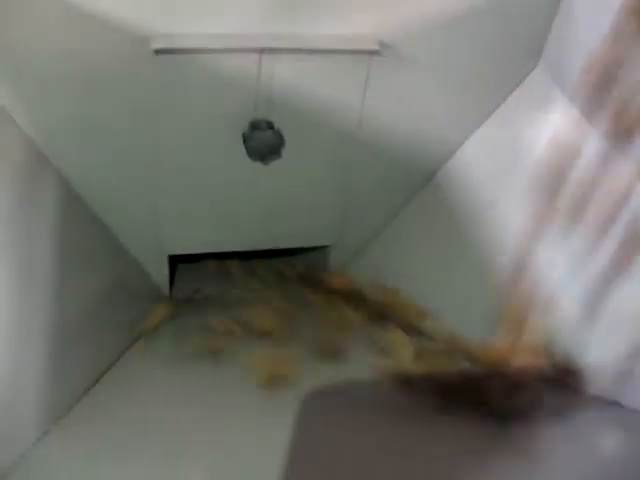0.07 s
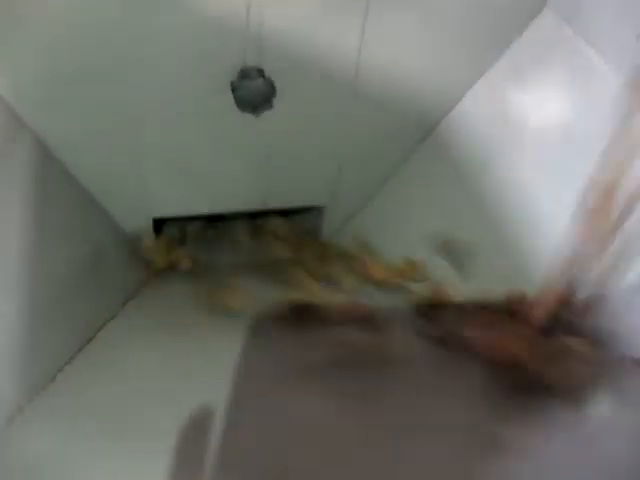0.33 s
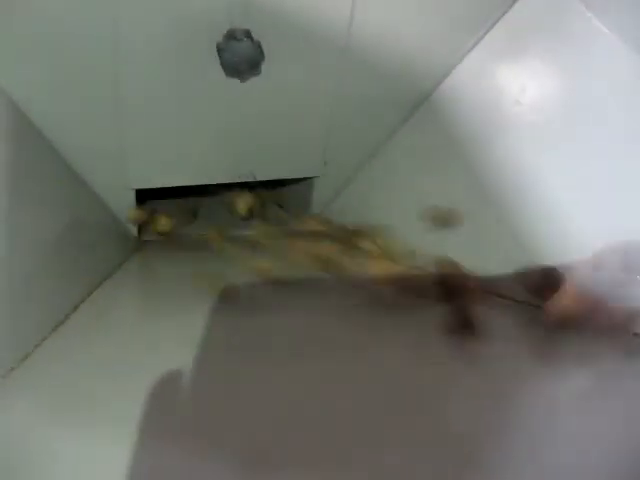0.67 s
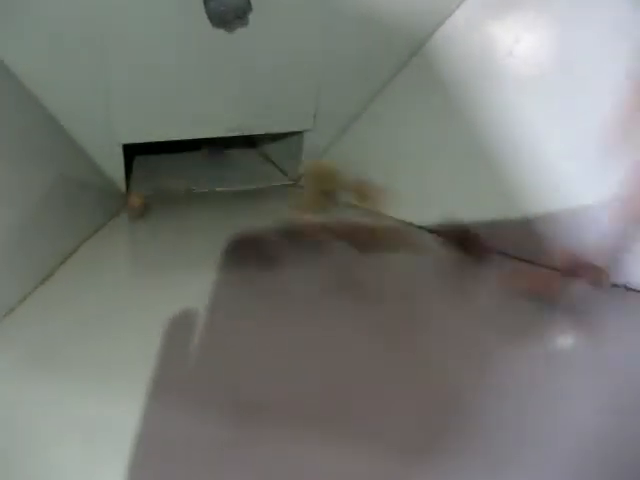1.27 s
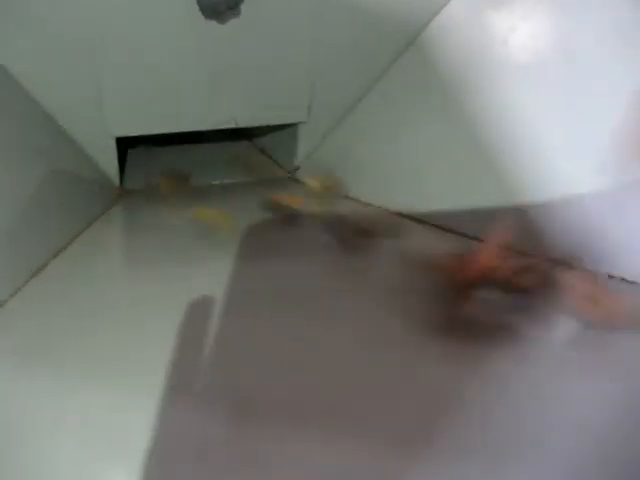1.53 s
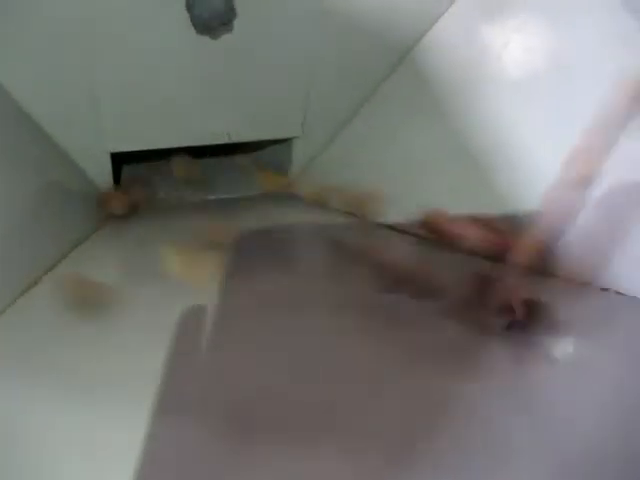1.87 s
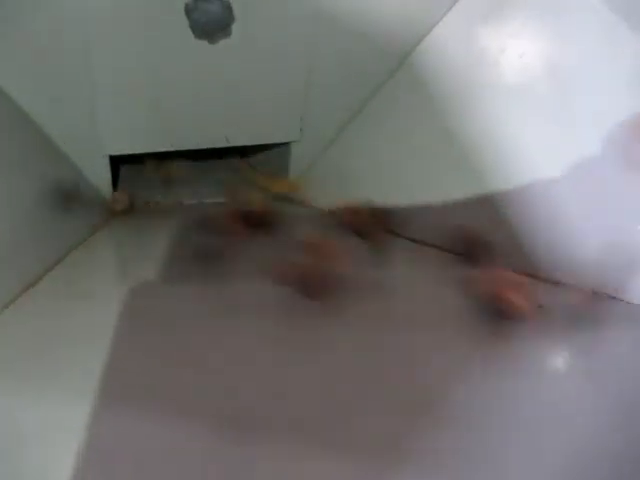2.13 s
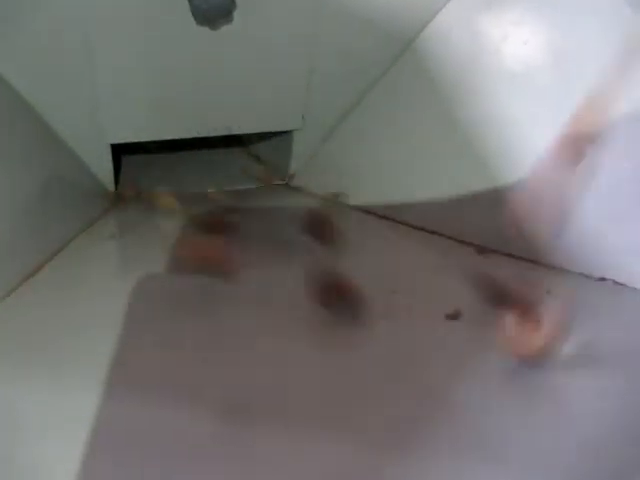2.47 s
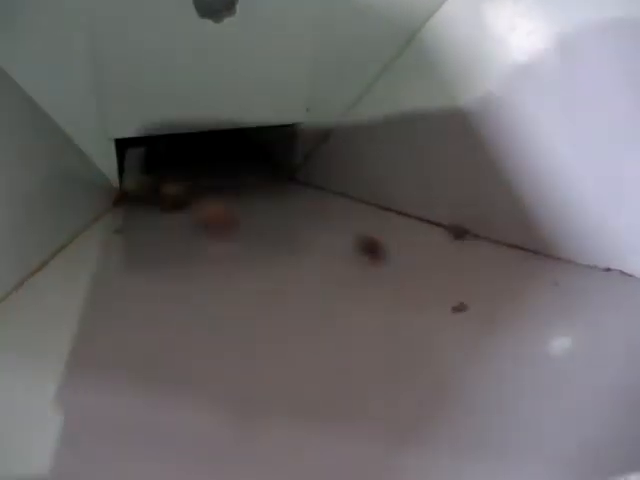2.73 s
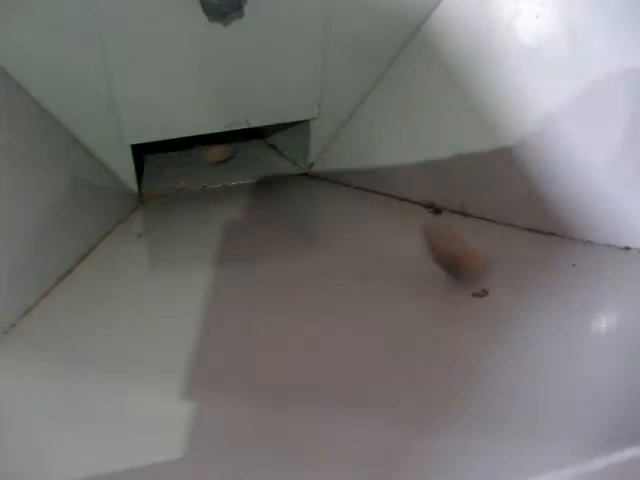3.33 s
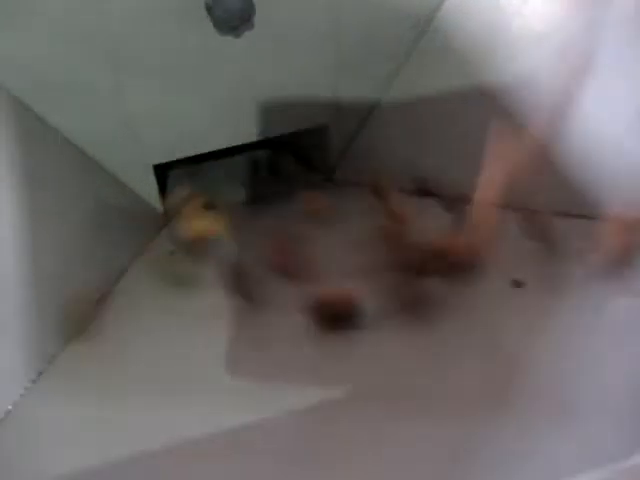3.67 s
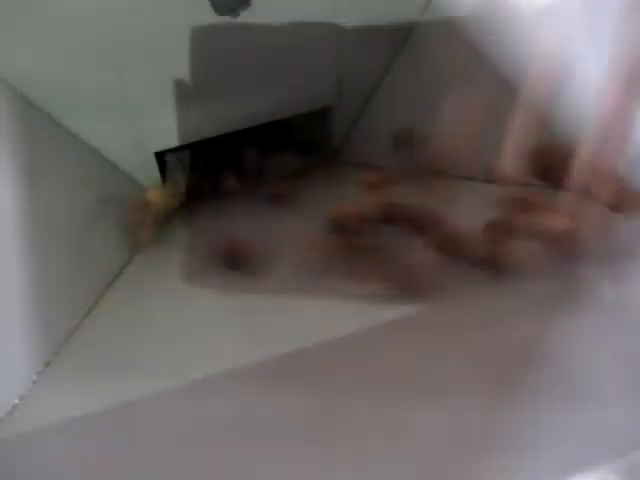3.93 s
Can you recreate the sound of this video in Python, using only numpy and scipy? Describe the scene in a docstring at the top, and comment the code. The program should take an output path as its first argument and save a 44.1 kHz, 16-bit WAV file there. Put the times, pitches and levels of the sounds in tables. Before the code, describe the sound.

Nuts rattle and clack down a steel hopper over a grading machine's loud drone.

```python
"""A steel hopper rattles with nuts over the drone of a grading machine, close to a small microphone.
The drive shakes the housing, nuts tumble inside, and dull blows make the panels boom.
Swept down by hand, single nuts clack on the ringing steel, thin out, then pour in a dense rattle.
The din overloads the microphone, which rounds off the peaks and passes little treble.
Near the end comes one tiny tick, brighter than all the rest."""
import sys
import numpy as np
from scipy import signal
from scipy.fft import rfft, irfft
from scipy.io import wavfile

SR = 44100
rng = np.random.default_rng(int(sys.argv[2]) if len(sys.argv) > 2 else 0)


def wrap_up_sound(samples):
    """Save the sound to the file named by the first command line argument, as 16-bit audio."""
    columns = np.atleast_2d(samples).T
    # keep every value between -1 and 1, then stretch to whole-number steps
    tamed = np.clip(columns, -1, 1)
    steps = np.round(tamed * 32767).astype(np.int16)
    wavfile.write(sys.argv[1], SR, steps)


N = 176400
T = np.arange(N) / SR

# resonances of the machine's housing (frequency [Hz], nominal width [Hz], level [dB])
HOUSING_MODES = [(266.4, 9.4, -45), (300.4, 22, -42.5), (399, 8.9, -44), (512, 14, -37.5),
                 (535.6, 8.7, -41.5), (563.4, 9.6, -38.5), (597, 9.1, -41), (624.4, 14, -40),
                 (687.2, 9, -40.5), (715.6, 4.7, -34.5), (765, 26, -38), (844.4, 18, -37.5),
                 (902, 17, -37.5), (947.4, 28, -39.5), (1004, 20, -38.5), (1327, 19, -43)]


def amp(db):
    """Decibels to gain."""
    return 10 ** (np.asarray(db) / 20)


def unit(x):
    """Scales to rms 1."""
    return x / np.sqrt(np.mean(x ** 2) + 1e-20)


def fader(points):
    """Gain that follows a table of (time [s], level [dB])."""
    return amp(np.interp(T, *np.transpose(points)))


def add(mix, s, sound):
    """Mixes a sound in at s seconds."""
    part = mix[max(round(s * SR), 0):][:len(sound)]
    part += sound[:len(part)]


def colour(x, points):
    """Causal filter that follows a table of (frequency [Hz], gain [dB])."""
    hz, db = np.transpose(points)
    f = abs(np.fft.fftfreq(2048, 1 / SR))
    log_gain = np.log(amp(np.interp(np.log(f + 1), np.log(hz), db)))
    minimum_phase = np.exp(np.conj(signal.hilbert(log_gain)))
    taps = np.fft.ifft(minimum_phase).real
    return signal.fftconvolve(x, taps[:len(taps) // 2])[:len(x)]


def lowpass(x, hz):
    """Steep band limit."""
    return signal.oaconvolve(x, signal.firwin(511, hz, window=("kaiser", 9), fs=SR), "same")


def resonate(x, hz, width_hz):
    """One resonance: the narrower it is, the longer it rings."""
    pole = np.exp((2j * hz - width_hz) * np.pi / SR)
    return signal.lfilter([1], [1, -pole], x).imag


def waver(rate_hz):
    """Slow random wobble of rms 1, strongest near the given rate."""
    ratio = np.fft.rfftfreq(N, 1 / SR) / rate_hz
    return unit(irfft(rfft(rng.standard_normal(N)) * ratio / (1 + ratio ** 4), N))


def machine(roar_db=-28.5, waver_db=0.8, hum_top_hz=437):
    """The drive shakes the housing: a wavering, hollow roar whose low hum swells and sinks."""
    # spectrum of the roar (frequency [Hz], relative level [dB])
    roar_spectrum = [(30, -41.5), (100, -20.5), (220, -9.5), (290, -10.5), (360, -11), (500, -3), (720, -4),
                     (950, -2), (1150, -5.5), (1500, -15), (2500, -13), (7000, -36)]
    # swell of the low hum (time [s], level [dB])
    hum_levels = [(0, -4.5), (.3, -0.5), (.45, 0), (.55, 2), (.77, 1.5), (.85, -1.5), (1.2, 0), (1.55, 4.5),
                  (1.6, -2.5), (1.98, -2), (2.06, 5.5), (2.4, 0), (2.8, 0), (3.3, -1.5), (3.78, 1), (4, -9)]
    roar = amp(roar_db) * unit(colour(rng.standard_normal(N), roar_spectrum))
    ring = np.zeros(N)
    for hz, width, db in HOUSING_MODES:
        shaking = resonate(rng.standard_normal(N), hz, 2 * width)
        ring += amp(db) * unit(resonate(shaking, hz, 2 * width))
    drone = (roar + ring) * amp(waver_db * waver(rate_hz=13.2))
    hum = signal.sosfiltfilt(signal.butter(4, hum_top_hz, fs=SR, output="sos"), drone)
    return drone - hum + fader(hum_levels) * hum


def clack(t60_s, crack_s=0.0021, crack_share=0.24):
    """One blow: a short crack, then dense reflections between the steel walls; energy 1."""
    t = T[:SR // 4]
    envelope = amp(-60 * t / t60_s) + crack_share * np.exp(-t / crack_s)
    burst = rng.standard_normal(len(t)) * envelope
    return burst / np.linalg.norm(burst)


def hail(per_s, spread_db, t60_s, spots=6):
    """Random blows of uneven size on several spots of the metal, each with its own clack."""
    out = np.zeros(N)
    for _ in range(spots):
        size = amp(spread_db * np.minimum(rng.exponential(1, N), 4))
        hits = rng.random(N) < per_s / spots / SR
        blows = size * hits / np.sqrt(per_s)  # the rate sets density, not loudness
        out += signal.oaconvolve(blows, clack(t60_s))[:N]
    return unit(out)


def tumbling(level_db=-24):
    """Nuts tumble behind the housing in a steady, duller rattle."""
    # spectrum of the rattle inside (frequency [Hz], relative level [dB])
    tumble_spectrum = [(300, -20), (1000, -14), (1450, -7), (1950, -0.5), (2600, 1), (3400, -2.5),
                       (4300, -8), (5500, -17.5), (7000, -15.5)]
    rattle = hail(per_s=2500, spread_db=5, t60_s=0.18)
    return amp(level_db) * unit(colour(rattle, tumble_spectrum))


def flow():
    """Strength of the stream down the hopper: uneven handfuls, a lull, then a full pour."""
    # stream of nuts (time [s], level [dB])
    pour_levels = [(0, -14), (.16, -22.5), (.21, -22.5), (.3, -19), (.37, -30), (.52, -19.5), (.65, -15),
                   (.77, -19), (.97, -15.5), (1.1, -20), (1.15, -24), (1.27, -21.5), (1.5, -25.5),
                   (1.7, -39.5), (2.22, -33), (2.41, -26), (2.48, -14.5), (3.1, -14.5), (3.7, -14.5),
                   (4, -15.5)]
    return fader(pour_levels)


def stream(trickle_per_s=250, pour_per_s=900):
    """Nuts strike more often as the flow grows; a trickle goes on between handfuls."""
    strength = flow()
    return hail(trickle_per_s + pour_per_s * strength / strength.max(), spread_db=4, t60_s=0.12)


def pouring(rumble_db=-35, waver_db=3):
    """The more nuts flow, the denser and louder the clatter, with an uneven deep rumble under it."""
    # deep rumble of the hopper (frequency [Hz], relative level [dB])
    rumble_spectrum = [(20, 0), (70, 1), (130, -2), (300, -26), (2000, -61.5)]
    # shells streaming over steel (frequency [Hz], relative level [dB])
    clatter_spectrum = [(60, -26), (220, -10), (550, 0), (950, 1.5), (1400, -7), (2000, 0), (2700, -1.5),
                        (3300, 0.5), (4200, 2), (5000, 1.5), (7000, -7.5)]
    rumble = unit(colour(rng.standard_normal(N), rumble_spectrum))
    rumble *= amp(rumble_db + waver_db * waver(rate_hz=11))
    clatter = unit(colour(stream(), clatter_spectrum))
    return flow() * (clatter + rumble)


def steel(blows, tumble_db=-25.5, knock_db=-5, ring_db=-2):
    """Stream, tumbling and single blows all ring the hopper's sheet steel at the same pitches."""
    # modes of the sheet (frequency [Hz], relative level [dB], time to fall 60 dB [s])
    steel_modes = [(1736, -20, 0.15), (1905, -22.5, 0.17), (1973, -16, 0.49), (2032, -21, 0.26),
                   (2100, -18.5, 0.15), (2170, -18.5, 0.23), (2280, -23, 0.23), (2355, -20, 0.098),
                   (2488, -20, .2), (2578, -22, .2), (2613, -19, 0.22), (2820, -25, .18), (3012, -15, 0.21),
                   (3226, -23.5, 0.16), (3330, -21, 0.11), (3532, -23, .22), (3520, -25.5, 0.16),
                   (3860, -26, .15), (3920, -21, .16), (3910, -21.5, 0.2), (4250, -23.5, .15),
                   (4370, -24.5, 0.16), (4690, -23.5, .12)]
    shaking = flow() * stream() + amp(tumble_db) * rng.standard_normal(N) + amp(knock_db) * blows
    ring = np.zeros(N)
    for hz, db, t60_s in steel_modes:
        width_hz = np.log(1000) / np.pi / t60_s
        ring += amp(db) * unit(resonate(shaking, hz, width_hz))
    return amp(ring_db) * shaking.std() * ring


def thuds(pitch_spread=0.064, t60_s=0.14, rise_s=0.0089):
    """Heavier blows set the housing's resonances nearest their pitch booming briefly."""
    # dull blows on the panels (time [s], level [dB], pitch [Hz])
    panel_blows = [(.015, -18, 740), (.02, -18.5, 530), (.055, -25, 275), (.24, -23, 710), (.355, -31, 290),
                   (.53, -18, 890), (.965, -20.5, 870), (1.27, -19, 590), (1.364, -27, 702),
                   (1.5, -20.5, 840), (1.649, -24, 915), (1.889, -17, 836), (1.9, -20.5, 577),
                   (2.031, -25, 600), (2.034, -26, 265), (2.235, -25.5, 433), (2.241, -32, 270),
                   (2.47, -18, 510), (2.51, -20.5, 530), (2.54, -15.5, 520), (2.545, -17.5, 840),
                   (2.575, -17.5, 560), (2.88, -18, 890), (3.375, -19, 382), (3.49, -12.5, 930),
                   (3.495, -19, 530), (3.635, -17, 553), (3.671, -25, 288), (3.775, -16.5, 910),
                   (3.9, -20.5, 694), (3.92, -14, 902), (3.965, -14.5, 700)]
    out, t = np.zeros(N), T[:SR // 2]
    mode_hz = np.array(HOUSING_MODES)[:, :1]
    for s, db, hz in panel_blows:
        share = 1 / (1 + (np.log(mode_hz / hz) / pitch_spread) ** 2)
        tones = np.sin(2 * np.pi * (mode_hz * t + rng.random(mode_hz.shape)))
        envelope = amp(db - 60 * t / t60_s) * np.minimum(t / rise_s, 1)
        add(out, s, envelope * unit((share * tones).sum(0)))
    return out


def knocks(gain_db=32.5, rise_s=0.0016):
    """Single nuts hit the hopper wall close to the microphone."""
    # strikes of single nuts (time [s], relative level [dB])
    nut_strikes = [(0.0406, -13), (0.1353, -15), (0.16, -11.5), (0.273, -18.5), (0.33, -12.5),
                   (0.3923, -15), (0.4085, -13), (0.4705, -14.5), (0.499, -20), (0.575, -26), (0.6979, -12),
                   (0.8758, -19), (0.9315, -16), (1.1024, -18.5), (1.156, -31), (1.176, -26), (1.2071, -16),
                   (1.2366, -17), (1.291, -15), (1.335, -23), (1.3541, -15), (1.4313, -14), (1.4514, -21.5),
                   (1.4912, -16), (1.592, -22), (1.621, -21.5), (1.6468, -20.5), (1.766, -27.5),
                   (1.804, -32), (1.846, -26), (1.8895, -18.5), (1.9034, -28), (2.072, -21), (2.286, -17),
                   (2.341, -17), (2.3905, -16), (2.4433, -13.5)]
    out = np.zeros(N)
    rise = np.minimum(T[:SR // 4] / rise_s, 1)  # reflections build up between the walls
    for s, db in nut_strikes:
        add(out, s, amp(db + gain_db) * rise * clack(t60_s=0.12))
    return out


def tick(at_s=3.4233, level_db=-13, decay_s=0.00004):
    """One tiny, dry, bright tick."""
    out = np.zeros(N)
    add(out, at_s, amp(level_db) * np.exp(-T[:SR // 100] / decay_s))
    return out


def scene():
    """Mono, beside the hopper; drone and tumbling grow louder the fuller the machine runs."""
    # load on the machine (time [s], level [dB])
    load_levels = [(0, 2), (.5, 2), (1.0, 2), (1.16, -0.5), (1.27, 0.5), (1.42, -0.5), (1.52, -0.5),
                   (1.62, -2.5), (1.77, -1), (1.84, -0.5), (1.97, -1.5), (2.05, -1), (2.13, -5), (2.27, 0),
                   (2.41, -1), (2.5, 2), (4, 4)]
    # colour of one hard knock of shell on steel (frequency [Hz], gain [dB])
    knock_spectrum = [(100, -24.5), (600, -11), (1400, -6.5), (2200, 4), (3300, 3.5), (4500, 3.5),
                      (5500, 1), (7000, -3.5)]
    inside = fader(load_levels) * (machine() + tumbling())
    blows = knocks()
    hopper = pouring() + colour(blows, knock_spectrum) + steel(blows)
    return (inside + hopper + thuds())[None]


def record(dry, overload_db=-10.5, din_top_hz=6966, tick_top_hz=15900):
    """This close, the small microphone overloads softly and dulls the din; the tick stays bright."""
    # response of the microphone (frequency [Hz], gain [dB])
    mic_response = [(20, -6), (100, 1.5), (4500, -1), (5200, -4), (5800, -7.5), (6300, -13.5), (6700, -26),
                    (7000, -36)]
    ceiling = amp(overload_db)
    rounded = ceiling * np.tanh(dry[0] / ceiling)
    dulled = lowpass(colour(rounded, mic_response), din_top_hz)
    return lowpass(dulled + tick(), tick_top_hz)[None]


dry = scene()
out = record(dry)
wrap_up_sound(out)
```